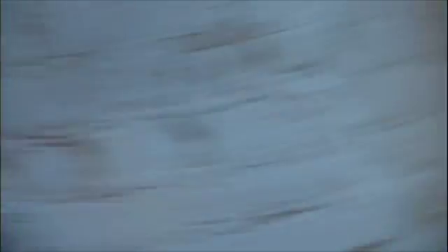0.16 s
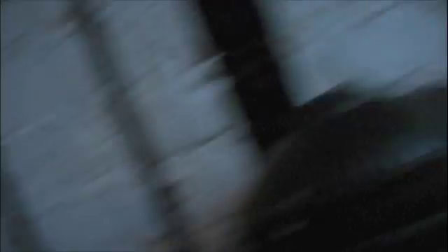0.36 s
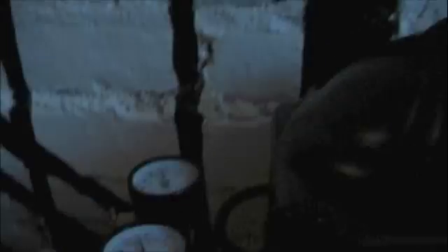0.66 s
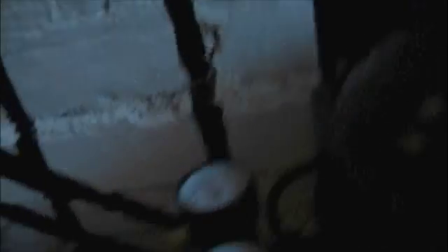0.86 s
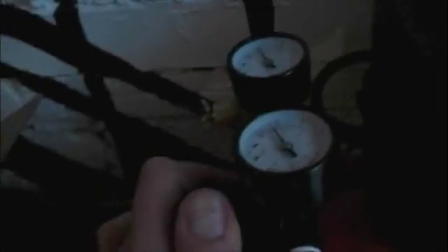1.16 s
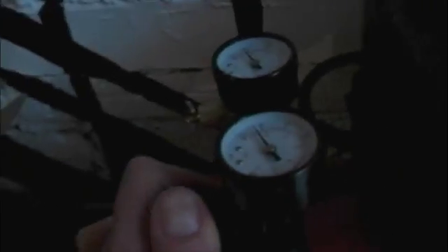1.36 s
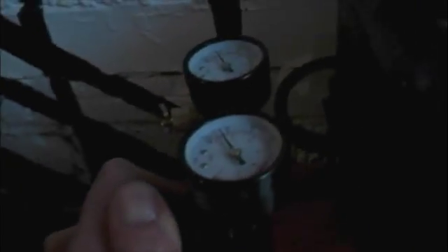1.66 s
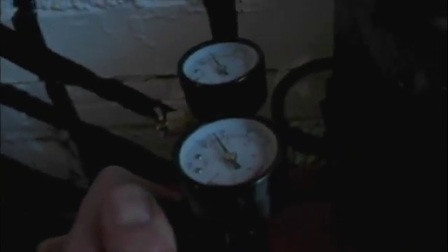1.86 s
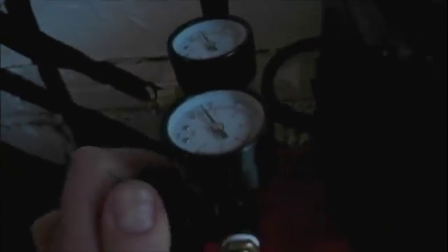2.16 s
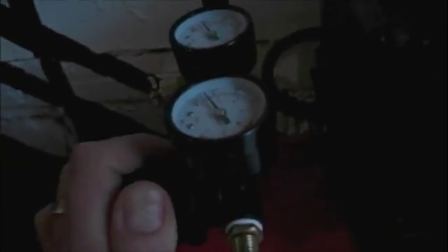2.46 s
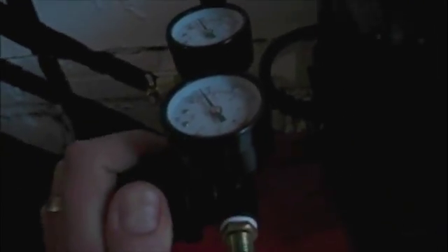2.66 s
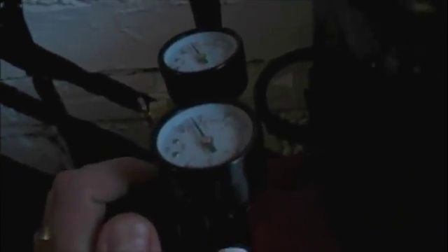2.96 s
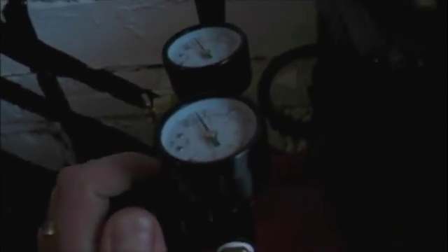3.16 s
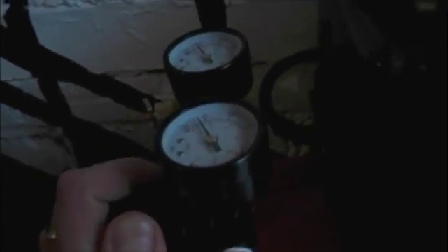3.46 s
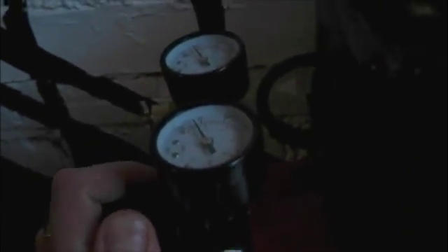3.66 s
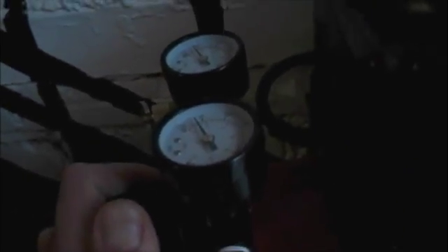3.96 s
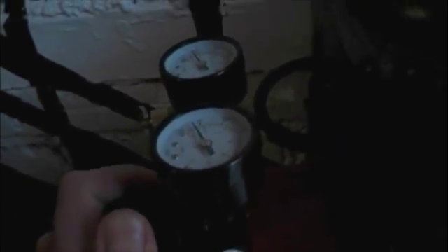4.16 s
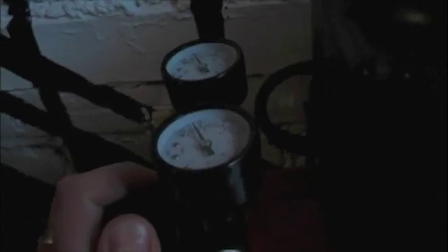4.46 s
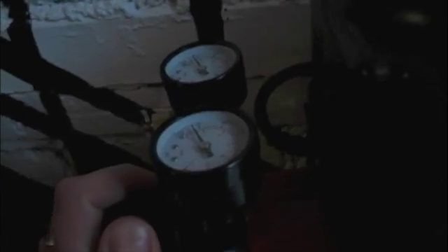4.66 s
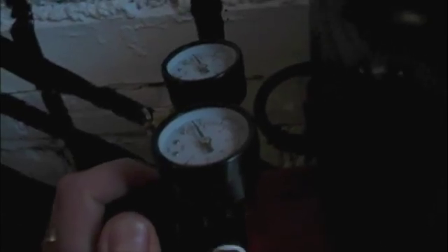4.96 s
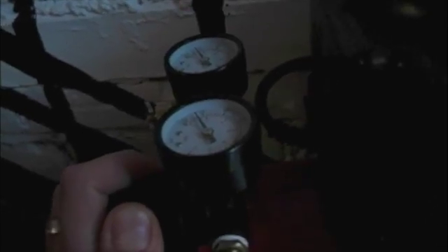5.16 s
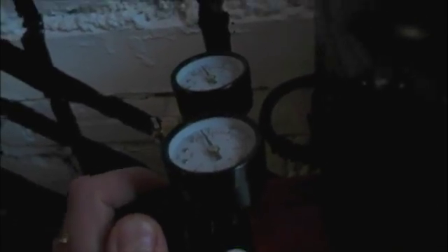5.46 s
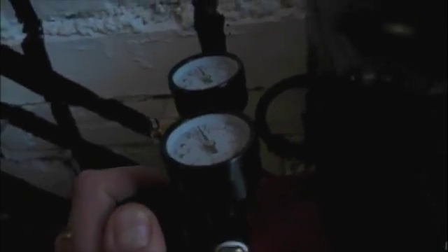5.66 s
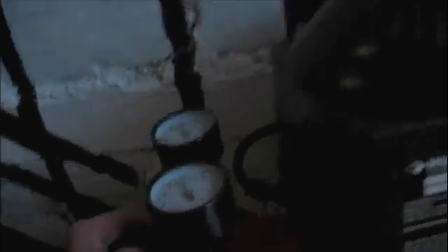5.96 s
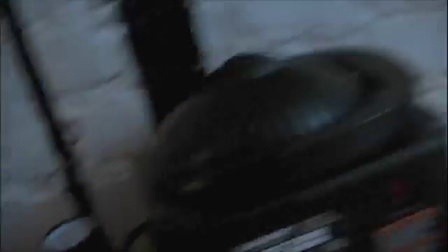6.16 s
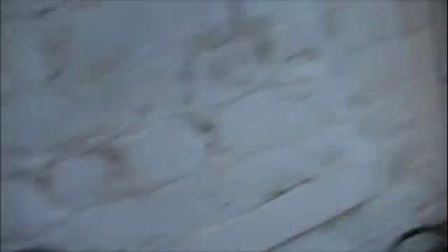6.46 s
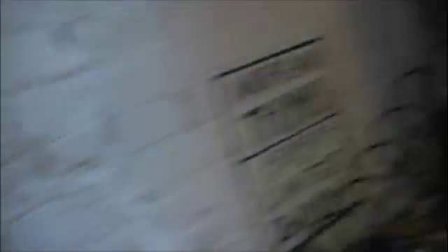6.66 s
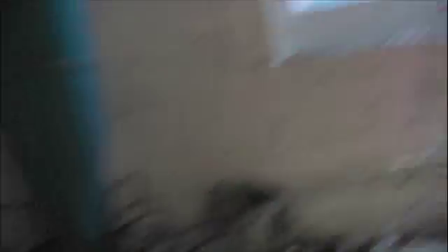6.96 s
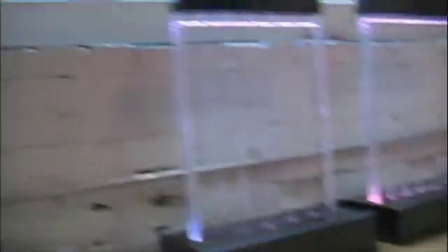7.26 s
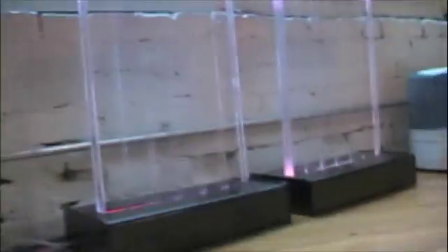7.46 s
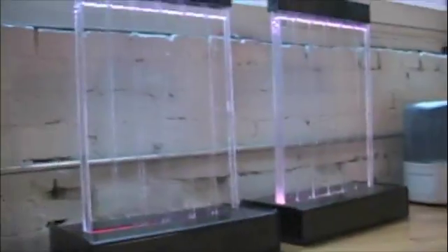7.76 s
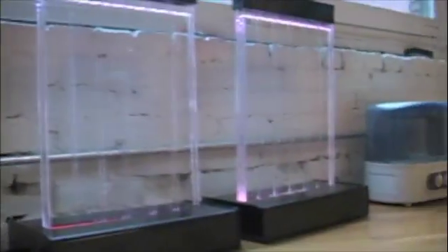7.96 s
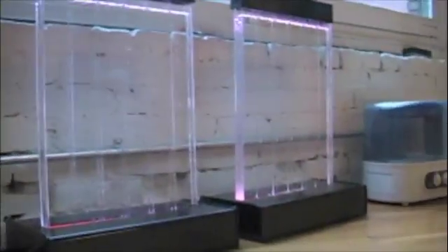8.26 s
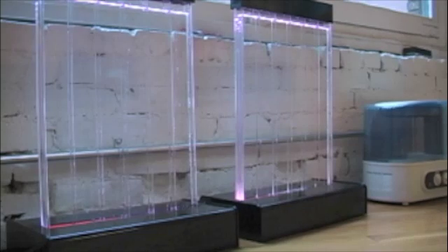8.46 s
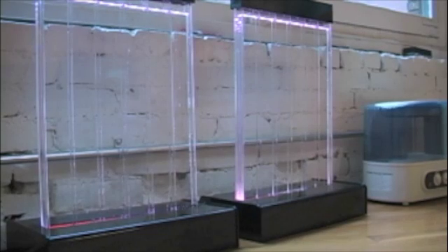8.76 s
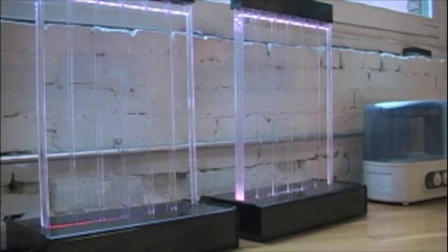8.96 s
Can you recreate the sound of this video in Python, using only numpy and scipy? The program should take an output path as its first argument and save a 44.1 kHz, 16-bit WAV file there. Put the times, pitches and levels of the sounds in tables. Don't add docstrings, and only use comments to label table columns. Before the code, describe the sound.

In a brick workshop, a compressor hums low while a regulator knob snaps sharply twice, air hisses briefly, and something hollow lands on a table.

```python
import sys
import numpy as np
from scipy import signal
from scipy.fft import rfft, irfft
from scipy.io import wavfile
from scipy.ndimage import uniform_filter1d

SR = 44100
rng = np.random.default_rng(int(sys.argv[2]) if len(sys.argv) > 2 else 0)


def volts_from_decibels(level):
    exponent = np.asarray(level, float) / 20
    return 10 ** exponent


def unload_audio(sound):
    columns = np.transpose(np.atleast_2d(sound))
    steps = np.round(np.clip(columns, -1, 1) * 32767)
    wavfile.write(sys.argv[1], SR, steps.astype(np.int16))


N = 402191


def evened(x):
    return x / np.sqrt(np.mean(x ** 2) + 1e-20)


def read(points, hz):
    f, value = np.transpose(points)
    return np.interp(np.log(hz + 1), np.log(f + 1), value)


def follow(rows, column=1):
    rows = np.array(rows)
    return np.interp(np.arange(N) / SR, rows[:, 0], rows[:, column])


def gated(rows):
    t = np.arange(N) / SR
    inside_s = np.minimum(t - rows[0][0], rows[-1][0] - t)
    return volts_from_decibels(follow(rows)) * np.clip(inside_s * 40 + .5, 0, 1)


def add(mix, s, sound):
    part = mix[:, round(s * SR):][:, :sound.shape[1]]
    part += sound[:, :part.shape[1]]


def hump(centre_hz, octaves):
    return lambda hz: np.maximum(-6 * (np.log2(hz / centre_hz) / octaves) ** 2, -70)


def peaks_db(peaks, hz):
    power = sum(volts_from_decibels(2 * db) / (1 + (2 * (hz - f) / w) ** 2) ** 2 for f, w, db in peaks)
    return 10 * np.log10(power)


def sides(pan_db, room_db):
    return volts_from_decibels(np.array([[pan_db / 2], [-pan_db / 2], [room_db]]))


def placed(sound, gain_db, pan_db, room_db):
    hz = np.fft.rfftfreq(len(sound), 1 / SR) + 1
    click = np.roll(irfft(volts_from_decibels(gain_db(hz))), 200)
    click *= np.linalg.norm(sound) / np.linalg.norm(click)
    return sides(pan_db, room_db) * np.array([sound, sound, click])


def crack(gain_db, t60, slope=0.1, rise=0.00015):
    t, hz = np.arange(8192) / SR, np.fft.rfftfreq(8192, 1 / SR) + 1
    z = rfft(rng.standard_normal(8192)) * volts_from_decibels(gain_db(hz))
    out = 0
    for centre in 62.5 * 2. ** np.arange(9):
        band = irfft(z * np.clip(1 - abs(np.log2(hz / centre)), 0, 1))
        out = out + band * volts_from_decibels(-60 * t / t60 * (centre / 1000) ** slope)
    out *= 1 - np.exp(-t / rise)
    return out / np.sqrt(np.mean(out[:200] ** 2))


def ring(modes, spread=0.012):
    t = np.arange(8192) / SR
    detune = 1 + spread * rng.standard_normal(len(modes))
    out = 0
    for k, (hz, db, t60) in zip(detune, modes):
        out = out + volts_from_decibels(db - 60 * t / t60) * np.sin(2 * np.pi * hz * k * t)
    return out * np.cos(np.linspace(0, np.pi / 2, len(t)))


def struck(rows, modes, rise, pan_db, room_db, spread):
    mix, t = np.zeros((3, N)), np.arange(4096) / SR
    hz, t60 = np.transpose(modes)[:, :, None]
    fade = volts_from_decibels(-60 * t / t60) * (1 - np.exp(-t / rise))
    detune = 1 + spread * rng.uniform(-1, 1, (len(rows), len(modes), 1))
    for (s, *levels_db), k in zip(rows, detune):
        rings = fade * np.sin(2 * np.pi * hz * k * t)
        add(mix, s, sides(pan_db, room_db) * (volts_from_decibels(np.array(levels_db)) @ rings))
    return mix


# pitch in Hz, likeness from 0 to 1
LIKENESS = [(60, 0.93), (150, 1), (380, 0.87), (950, 0.51), (2380, 0.22), (5980, 0.06), (15000, 0.067)]
# pitch in Hz, left minus right in dB
LEFT_LEAN = [(60, -0.5), (240, -1.5), (950, 0), (3770, 0.0), (15000, 0.5)]


def field(gain_db, same=LIKENESS, size=1024, patchy_db=4.0, count=N):
    hz, t = np.fft.rfftfreq(size, 1 / SR), np.arange(4 * count // size + 5) * size / 4 / SR
    a, b, c, d, patch = rng.standard_normal((len(t), len(hz), 5)).T
    patch = uniform_filter1d(patch, size=8, axis=0)
    patch = evened(uniform_filter1d(patch, size=10, axis=1))
    like = np.clip(read(same, hz), -1, 1)[:, None]
    left, other = a + 1j * b, c + 1j * d
    z = np.array([left, like * left + np.sqrt(1 - like ** 2) * other])
    lean = read(LEFT_LEAN, hz)[:, None] / 2
    z *= volts_from_decibels(gain_db(hz[:, None], t) + patchy_db * patch + np.array([lean, -lean]))
    noise = signal.istft(z, nperseg=size, noverlap=3 * size // 4)[1][:, :count]
    return np.pad(evened(noise), ((0, 0), (0, N - count)))


# pitch in Hz, time to fade by 60 dB in seconds
ROOM_FADE = [(150, .45), (400, 0.75), (1000, 0.83), (2500, .8), (5000, .75), (8000, 0.65), (14000, 0.47)]
# pitch in Hz, level in dB
ROOM_COLOUR = [(150, 1), (450, -2), (1200, -2.5), (3000, -1), (6000, 1.5), (10000, 1.5), (15000, -9.5)]


def room(x):
    taps = np.zeros((2, SR))
    at = np.arange(120, SR - 20, 20) + rng.integers(0, 20, (2, (SR - 121) // 20))
    np.put_along_axis(taps, at, rng.choice([-1., 1.], at.shape), 1)
    taps[1] = 0.55 * taps[0] + 0.83 * taps[1]
    hz, t, z = signal.stft(taps, SR, nperseg=256)
    near_db = 8 * np.exp(-t / .015)
    fade_db = -60 * t / read(ROOM_FADE, hz)[:, None]
    z = z * volts_from_decibels(read(ROOM_COLOUR, hz)[:, None] + fade_db + near_db)
    tail = signal.istft(z, SR, nperseg=256)[1]
    return signal.fftconvolve(x[None], tail / np.linalg.norm(tail[0]), axes=1)[:, :N]


# pitch in Hz, level in dB
HUM_NEAR = [(8.8, -47), (15, -18), (32, -13.5), (62, 0), (81, 2), (98, -0.5), (129, 0), (150, -2),
            (171, -8.5), (205, -18.5), (223, -15.5), (260, -14.5), (340, -47), (570, -120)]
# pitch in Hz, level in dB
HUM_AWAY = [(8.8, -32), (15, -3.5), (65, 0.5), (79, -2.5), (97, -10), (124, -11.5), (173, -20), (215, -4),
            (260, -8), (340, -38), (570, -120)]
# time in seconds, closeness to the compressor from 0 to 1
CLOSENESS = [(0, .9), (6.1, .95), (6.55, 0.15), (7.5, .3), (9.12, .4)]


def hum():
    def gain_db(hz, t):
        near = np.clip(np.interp(t, *np.transpose(CLOSENESS)), 0, 1)
        return near * read(HUM_NEAR, hz) + (1 - near) * (read(HUM_AWAY, hz) - 3)
    level_db = -58 - 3 * (1 - follow(CLOSENESS))
    return field(gain_db, size=4096, patchy_db=-0.3) * volts_from_decibels(level_db)


# pitch in Hz, level in dB
WHINE_TONES = [(1696, -89.5), (2686, -91), (4495, -91.5), (4797, -90), (5093, -92)]


def whine():
    t = np.arange(N) / SR
    tones = 0
    for hz, db in WHINE_TONES:
        drift = .25 * np.cumsum(rng.standard_normal(N)) / np.sqrt(SR) * 2 * np.pi
        tones = tones + volts_from_decibels(db + 5.5) * np.sin(2 * np.pi * hz * t + drift)
    return tones * np.clip(follow(CLOSENESS), 0, 1)


# pitch in Hz, level in dB
WASH_COLOUR = [(88, -27.5), (150, 2), (201, -21), (226, -15.5), (354, -16.5), (524, -20.5), (578, -21),
               (923, -24), (1760, -28), (4160, -36.5), (4950, -36), (6910, -39), (16000, -41.5)]
# time in seconds, rustle level in dB
MOTION = [(0, -66), (0.478, -64), (0.98, -63), (1.2, -65), (2.2, -85), (5.9, -85), (6.64, -67.5),
          (7.27, -75.5), (7.54, -61.5), (7.93, -67.5), (8.14, -65), (8.35, -58), (8.67, -66), (9.12, -58.5)]


def wash():
    still_db = -82
    level_db = -60.5 + 0.1292 * (follow(MOTION) - still_db)
    return field(lambda hz, t: read(WASH_COLOUR, hz) + 0 * t, patchy_db=.5) * volts_from_decibels(level_db)


# pitch in Hz, level in dB
RUSTLE_COLOUR = [(350, -26), (600, 3.5), (834, -6), (1070, -4), (1280, -8), (1590, -8.5), (3940, -11),
                 (9360, -18), (16000, -25.5)]


def rustle():
    noise = field(lambda hz, t: read(RUSTLE_COLOUR, hz) + 0 * t, size=256, patchy_db=2.0)
    return noise * volts_from_decibels(follow(MOTION))


# pitch in Hz, level in dB
CLINK_COLOUR = [(150, -32.5), (250, -4), (444, -13), (557, -11), (1180, -15), (2150, -22), (2570, -6),
                (5350, -6.5), (12800, -10.5), (16000, -40)]


def earlier_tail():
    bands = [(2615, 150, 0.5), (3050, 250, -6.5), (5450, 220, 2.0), (6500, 400, -1),
             (8124, 240, -0.5), (6000, 55000, -9.5)]

    def gain_db(hz, t):
        colour_db = read(CLINK_COLOUR, hz) + peaks_db(bands, hz)
        return colour_db + 7 * np.exp(-t / .012) - 60 * t / (0.76 * read(ROOM_FADE, hz))
    tail = field(gain_db, [(100, .7), (9000, 0.457)], size=512, patchy_db=1.84, count=N // 9)
    return 0.75 * volts_from_decibels(-47.5) * tail


# start in seconds, peak in dB, pitch in Hz
BUMPS = [(0.178, -53, 900), (0.269, -49, 384), (0.301, -50.5, 365), (0.338, -37.5, 360),
         (0.552, -47.5, 323), (0.641, -50, 362), (0.714, -41.5, 480), (0.752, -47, 200),
         (7.037, -51.5, 315.4), (7.538, -49.5, 296), (8.575, -44, 450)]


def bumps():
    mix = np.zeros((3, N))
    for s, db, centre_hz in BUMPS:
        bump = volts_from_decibels(db - 5.0) * crack(hump(centre_hz, .75), .06, slope=0.65, rise=0.0017)
        add(mix, s, placed(bump, hump(centre_hz, 0.28), .7, -7.0))
    return mix


def scuff(gain_db, length):
    n = int(length * SR) + 40
    grain_db = 2.5 * np.minimum(rng.exponential(1, 8192), 4)
    grains = rng.standard_normal(8192) * volts_from_decibels(grain_db)
    noise = rfft(grains) * volts_from_decibels(gain_db(np.fft.rfftfreq(8192, 1 / SR) + 1))
    return evened(irfft(noise)) * np.pad(signal.windows.hann(n), (0, 8192 - n))


# middle in seconds, level in dB, centre pitch in Hz
TICKS = [(0.332, -56, 1600), (.394, -60, 9350), (0.44, -66, 8100), (0.732, -60, 1500), (1.639, -63, 8200),
         (2.763, -64.5, 4506), (5.251, -70.5, 8980), (5.996, -62.5, 6300), (6.077, -69, 3800),
         (7.013, -61.5, 3600), (8.64, -64, 9370)]
# middle in seconds, level in dB, centre pitch in Hz
SCUFFS = [(0.474, -63, 4000), (0.551, -60, 7260), (0.637, -59, 6000), (1.317, -62.5, 4500),
          (1.704, -66.5, 7890), (2.189, -67, 7020), (3.121, -71.5, 8940), (3.217, -67.5, 7990),
          (0.885, -60, 900), (4.461, -69, 8000), (4.99, -68, 3272), (6.114, -69, 7540),
          (6.657, -66.5, 6000), (6.692, -68, 6460), (7.035, -64, 6000), (7.515, -62, 5020),
          (7.72, -62.5, 9000)]
# middle in seconds, level in dB, centre pitch in Hz,
# width in octaves, length in seconds
GRIPS = [(7.543, -46.5, 1900, 2, 0.0077), (7.503, -57, 5000, .3, .007), (7.513, -60, 5000, .2, .014),
         (7.525, -62, 3700, .3, .014), (7.57, -60, 1400, 1.1, .08), (7.585, -64.5, 4980, 2.2, 0.044),
         (4.17, -73, 2200, .5, .12), (9.069, -63, 2940, 0.67, .1)]


def rubs():
    mix = np.zeros((3, N))
    # width in octaves, length in seconds, room in dB
    rows = [r + (.6, .009, -10) for r in TICKS]
    rows += [r + (1.05, .032, -5.5) for r in SCUFFS]
    rows += [r + (1.5,) for r in GRIPS]
    for s, db, centre_hz, width, length, room_db in rows:
        colour = hump(centre_hz, width)
        rub = volts_from_decibels(db) * scuff(colour, length)
        add(mix, s - length / 2, placed(rub, colour, 0.46, room_db))
    return mix


# start in seconds, peak in dB, base pitch in Hz, ring in dB
CLINKS = [(0.79, -52, 2930, -5.5), (.811, -55, 3020, -6), (.893, -67, 2900, -3), (0.914, -57, 2990, -13),
          (0.93, -54, 2900, -5), (0.955, -55.5, 2923, -15), (6.4172, -50.5, 2780, 5),
          (6.765, -62.5, 2850, -5.5), (6.844, -58, 2900, -12.5), (6.860, -55.5, 2894, -2),
          (8.379, -45.5, 2633, 3), (8.474, -54.5, 2660, 5)]
# multiple of the base pitch, level in dB, 60 dB fade in seconds
BUCKLE = [(.94, -4, .05), (1, -4, .05), (1.06, -5, 0.04), (1.13, -5.5, .035), (1.2, 0, 0.02),
          (1.88, -5, .012), (2.1, -7.5, .01)]


def clinks():
    mix, room_db = np.zeros((3, N)), -8
    for s, db, base_hz, ring_db in CLINKS:
        tones = [(k * base_hz, level_db, fade) for k, level_db, fade in BUCKLE]
        modes = volts_from_decibels(db + ring_db) * ring(tones)
        colour = lambda hz: read(CLINK_COLOUR, hz)
        tick = volts_from_decibels(db) * crack(colour, .047, slope=.2, rise=0.0012)
        out = placed(tick, colour, .8, room_db)
        add(mix, s, out + modes * volts_from_decibels(np.array([[0], [-.8], [room_db + 4.5]])))
    return mix


# pitch in Hz, 60 dB fade in seconds
FRAME = [(2570, .06), (2950, .045), (5500, .022), (6020, .015)]
# start in seconds, then the level of each tone in dB
TOUCHES = [(.799, -70, -60, -66, -70), (.81, -70, -62, -51, -64), (.813, -70, -58, -53, -66),
           (.893, -72, -51, -70, -72), (.898, -72, -54, -70, -72), (.913, -72, -62, -59, -68),
           (.927, -72, -53, -62, -66), (.932, -70, -52, -60, -68), (.957, -72, -56, -64, -64),
           (.963, -72, -55, -70, -70), (.975, -72, -61, -72, -72), (6.4168, -55, -53, -55, -58),
           (6.4188, -53, -49, -49, -47), (6.4235, -53, -51, -52, -54), (6.436, -57, -64, -66, -68),
           (6.443, -58, -66, -62, -70), (6.459, -62, -61, -70, -70), (6.47, -62, -68, -70, -70),
           (6.51, -64, -67, -72, -72), (6.548, -63, -68, -72, -72), (8.38, -46, -48, -60, -62),
           (8.388, -47, -46, -62, -62), (8.401, -51, -48, -54, -66), (8.412, -52, -56, -60, -66),
           (8.426, -48, -52, -66, -66), (8.44, -52, -47, -66, -66), (8.457, -51, -54, -66, -66),
           (8.48, -50, -48, -64, -66), (8.495, -52, -58, -66, -68), (8.51, -53, -56, -66, -68),
           (8.527, -55, -54, -66, -68), (8.545, -56, -56, -64, -70), (8.655, -55, -68, -72, -72)]


def buckle_frame():
    return volts_from_decibels(2.5) * struck(TOUCHES, FRAME, .0012, .8, -11, .02)


# start in seconds, peak in dB, room in dB
SNAPS = [
    (0.9914, -12, -19.5),
    (1.7877, -13.5, -26.5),
]
# pitch in Hz, level in dB per Hz
SNAP_COLOURS = [
    [(88, -35), (150, -21), (475, -6), (800, 3), (1450, -2), (2500, -7), (3620, -0.5), (4860, -10),
     (5680, -2.5), (6640, -10.5), (7920, 0.5), (9440, -11.5), (10400, -2), (11900, -10.5), (14500, -5),
     (16000, -20)],
    [(88, -38), (150, -12.5), (774, 1), (1210, -9), (1560, -16), (2750, -1), (3290, -6), (4080, 3),
     (4860, -8), (7770, -9.5), (8730, -12), (10000, -4), (11000, -14), (15100, -20.5), (16000, -31)],
]
# pitch in Hz, level in dB per Hz
SNAP_ECHOES = [
    [(88, -65), (150, -34.5), (321, -14.5), (376, -24), (450, -10), (700, -21), (1720, -20.5),
     (7920, -30.5), (14000, -33), (16000, -60.5)],
    [(88, -70.5), (150, -36), (298, -4.5), (524, -10.5), (954, -8.5), (1280, -19.5), (2210, -16.5),
     (3220, -19.5), (4020, -19.5), (9000, -28.5), (11700, -54.5), (19800, -120)],
]
# pitch in Hz, width in Hz, dB over the echo
SNAP_BANDS = [
    [(1700, 500, 4.5), (3689, 380, 0), (8200, 300, 5)],
    [(2480, 300, 4), (4000, 397, 4), (5400, 340, 8)],
]
# pitch in Hz, level in dB, 60 dB fade in seconds
SNAP_BODIES = [
    [(428, -15.5, .45), (450, -24, 0.15), (509.5, -18, 0.18), (582, -19, 0.22), (1480, -2, 0.018),
     (1150, -20, 0.2), (8070, 0, .014), (13200, -14, 0.008)],
    [(305, -20, 0.2), (430, -26, 0.3), (3004, -14, 0.055), (2650, -9, 0.055), (4150, -8, 0.045),
     (5560, -14, 0.041), (1950, -18, .08)],
]
# pitch in Hz, left-right difference against the snap in dB
SNAP_SIDES = [
    [(60, 4.5), (180, -2), (550, -20), (1650, -12), (4970, -5.5), (15000, -5)],
    [(60, -3), (180, -19), (550, -15.5), (1650, -7), (4970, -8.5), (15000, -2.5)],
]
SNAP_LEANS = [-0.91, -3]


def snaps():
    mix = np.zeros((3, N))
    no_bass = signal.butter(3, 215, "high", fs=SR)
    tables = zip(SNAPS, SNAP_COLOURS, SNAP_ECHOES, SNAP_BANDS, SNAP_BODIES, SNAP_SIDES, SNAP_LEANS)
    for (s, db, room_db), colour, echo, bands, body, side, lean in tables:
        modes = volts_from_decibels(db) * ring(body, 0)
        sound = volts_from_decibels(db) * crack(lambda hz: read(colour, hz), 0.046, slope=0.33, rise=.0001) + modes
        side_colour = lambda hz: read(colour, hz) + read(side, hz)
        apart = volts_from_decibels(db - 7.0) * crack(side_colour, .03, slope=.2, rise=0.00047)
        flat = (1000, 1e6, 0)
        echo_colour = lambda hz: read(echo, hz) + peaks_db(bands + [flat], hz)
        out = placed(sound, echo_colour, lean, room_db - db)
        out = out + np.array([[1], [-1], [0]]) * apart
        add(mix, s, signal.lfilter(*no_bass, out))
    return mix


# pitch in Hz, 60 dB fade in seconds
GROOVE = [(585, .05), (1000, .04), (1145, .065), (2190, .04)]
# start in seconds, then the level of each tone in dB
REBOUNDS = [
    (.9918, -26, -44, -25, -28),
    (.9932, -23, -40, -25, -30),
    (1.788, -19, -27, -30, -33),
    (1.79, -30, -29, -28, -31),
]
# pitch in Hz, 60 dB fade in seconds
SPRING = [(5610, .018), (7520, .012), (8870, .008), (10400, .009)]
# start in seconds, then the level of each tone in dB
CHATTER = [
    (.9914, -24, -22, -8, -9),
    (.9922, -22, -18, -16, -9),
    (.9932, -12, -11, -22, -22),
    (.9975, -34, -22, -30, -28),
    (1.0015, -34, -30, -24, -22),
]


def lock_contacts():
    ring_hits = struck(REBOUNDS, GROOVE, .0002, -1.5, -22, .004)
    return ring_hits + struck(CHATTER, SPRING, .00015, -.8, -24, .004)


# start in seconds, peak in dB, treble tick in dB
KNOCKS = [(1.361, -33, -23.5), (2.065, -43.5, -11.5), (2.469, -43.5, -16), (2.706, -48, -14.5),
          (3.759, -34.5, -22.5), (3.84, -55, -25), (4.41, -44, -28), (4.553, -44.5, -27),
          (5.578, -34.5, -28)]
# pitch in Hz, level in dB, 60 dB fade in seconds
KNOB = [(545, -7, 0.05), (620, -8.5, 0.27), (613, -6.5, 0.098), (965, -7, 0.13), (925, -2.5, 0.06),
        (1500, -10, 0.03), (3450, -15, 0.018)]
# pitch in Hz, level in dB
KNOB_TICK = [(180, -51), (300, -19.5), (502, 1.5), (970, -4), (1280, -14), (1850, -13.5), (2510, -37.5),
             (3460, -24), (14000, -42.5)]


def knocks():
    mix = np.zeros((3, N))
    colour = lambda hz: read(KNOB_TICK, hz)
    for s, db, tick_db in KNOCKS:
        knock = volts_from_decibels(-8.5) * crack(colour, 0.047, rise=0.0005) + ring(KNOB, 1 / 200)
        knock *= 1 - np.exp(-np.arange(len(knock)) / SR / 0.0015)
        knock += volts_from_decibels(tick_db + 3.0) * crack(hump(2600, 1.7), 0.012, rise=.0005)
        add(mix, s, placed(volts_from_decibels(db - 3.5) * knock, colour, 0.47, -10.5))
    return mix


# time in seconds, level in dB
LEAK = [
    (1.52, -80),
    (1.67, -65),
    (1.774, -54.5),
    (1.80, -49),
    (2.058, -54),
    (2.14, -83),
]
# pitch in Hz, width in Hz, level in dB
VALVE = [(6000, 280, -16), (9920, 220, 2), (11470, 800, -4), (13100, 400, -14), (14150, 300.3, -13.5),
         (15000, 400, -15)]


def leak():
    air = field(lambda hz, t: peaks_db(VALVE, hz) + 0 * t, [(100, 0.84), (9000, 0.89)],
                size=512, patchy_db=-1.5, count=N // 4)
    return air * gated(LEAK)


# start in seconds, peak in dB, treble in dB, left minus right in dB
TABLE = [
    (8.1, -47, -23, 0.5),
    (8.136, -50, -12.5, 0),
    (8.176, -32, -4.5, 4.5),
    (8.226, -30, -7.5, 4.5),
    (8.3775, -35, -6.5, 3.5),
    (8.437, -38.5, -22, 3),
    (8.463, -43.5, -25, 9),
    (8.471, -42, -11.5, -5),
]
# pitch in Hz, level in dB
TABLE_COLOUR = [(59, -39), (100, -6), (250, 2.5), (436, 2), (805, -2), (1060, -2.5), (1370, -1), (1640, -6),
                (1800, -14), (2330, -23), (2600, -9), (3380, -24), (5720, -120)]


def table_knocks():
    mix, t60 = np.zeros((3, N)), 0.047
    colour = lambda hz: read(TABLE_COLOUR, hz)
    for s, db, treble_db, pan_db in TABLE:
        room_db = 0.5 - 0.4 * min(db + 33, 0)
        thud = volts_from_decibels(db - 8.0) * crack(colour, t60, rise=0.0013)
        rattle = volts_from_decibels(db + treble_db - 2.0) * crack(hump(5400, 1.0), 0.72 * t60)
        add(mix, s, placed(thud, colour, pan_db, room_db - 7.0))
        add(mix, s, placed(rattle, hump(3400, 1.25), pan_db, room_db))
    return mix


# pitch in Hz, 60 dB fade in seconds
SHELL = [(395, .033), (780, .042), (980, .04), (1420, .022)]
# start in seconds, then the level of each tone in dB
ROCKING = [(8.1, -44, -48, -56, -58), (8.137, -45, -45, -48, -47), (8.1762, -44, -42, -29, -26),
           (8.1798, -30, -38, -35, -38), (8.1855, -38, -33, -40, -44), (8.2262, -42, -40, -32, -26),
           (8.2285, -25, -38, -33, -36), (8.233, -38, -42, -42, -48), (8.378, -42, -31, -42, -40),
           (8.3815, -33, -37, -48, -50), (8.3905, -42, -40, -46, -33), (8.394, -35, -37, -46, -46),
           (8.437, -46, -44, -46, -34), (8.44, -38, -39, -48, -46), (8.4635, -40, -41, -48, -48),
           (8.4725, -48, -44, -42, -45), (8.4765, -37, -41, -50, -50), (8.4815, -50, -48, -45, -48)]
# pitch in Hz, 60 dB fade in seconds
PANEL = [(590, .03), (690, .025)]
# start in seconds, then the level of each tone in dB
PANEL_KNOCKS = [(8.102, -50, -52), (8.14, -50, -50), (8.181, -36, -38), (8.229, -33, -36),
                (8.379, -38, -38), (8.393, -42, -40), (8.441, -41, -41), (8.465, -43, -43),
                (8.475, -42, -43), (8.482, -46, -46)]


def shell_contacts():
    shell = struck(ROCKING, SHELL, .0005, 4, -22, .03)
    return shell + struck(PANEL_KNOCKS, PANEL, .0007, 4, -22, .04)


# pitch in Hz, level in dB, 60 dB fade in seconds
BOOM = [(56, -45, 0.76), (75.8, -44.5, 0.27)]
# start in seconds, level in dB, centre pitch in Hz, width in octaves,
# 60 dB fade in seconds
SLAPS = [
    (8.572, -43.5, 2200, 1.2, 0.024),
    (8.575, -54.5, 1700, 0.7, 0.34),
    (8.575, -53, 3550, .3, .02),
    (8.607, -49.5, 1600, 0.75, 0.056),
]


def strap_slaps():
    mix = np.zeros((3, N))
    add(mix, 8.573, placed(ring(BOOM), hump(60.1, .5), 0, -18.0))
    for s, db, centre_hz, width, t60 in SLAPS:
        colour = hump(centre_hz, width)
        slap = volts_from_decibels(db) * crack(colour, t60, slope=0.14, rise=0.0011)
        add(mix, s, placed(slap, colour, 11.4, 0.4))
    return mix


# pitch in Hz, 60 dB fade in seconds
CLASP = [(565, .06), (1450, .04), (1950, .03), (3500, .025)]
# start in seconds, then the level of each tone in dB
SKIPS = [
    (8.5722, -46, -39, -38, -44),
    (8.5768, -42, -46, -44, -43),
    (8.5803, -48, -45, -43, -52),
    (8.607, -58, -51, -50, -60),
    (8.622, -62, -56, -52, -66),
    (8.648, -64, -54, -56, -68),
    (8.684, -66, -60, -55, -70),
]


def clasp():
    return struck(SKIPS, CLASP, .0002, 8, -18, .07)


def scene():
    steady = hum() + whine() + wash() + rustle() + earlier_tail() + leak()
    hits = bumps() + rubs() + clinks() + buckle_frame() + snaps() + lock_contacts() + knocks()
    hits = hits + table_knocks() + shell_contacts() + strap_slaps() + clasp()
    return steady + hits[:2] + room(hits[2])


def roll_off(x):
    return signal.sosfilt(signal.butter(12, 16570, fs=SR, output="sos"), x)


def record(dry):
    band_limit = signal.firwin(511, 15700, window=("kaiser", 9), fs=SR)[None]
    limited = signal.oaconvolve(np.clip(dry, -1, 1), band_limit, "same")
    return roll_off(limited)


dry = scene()
out = record(dry)
unload_audio(out)
```